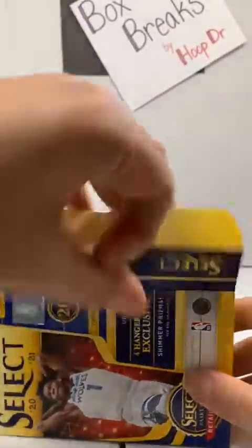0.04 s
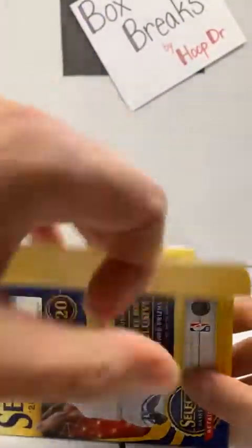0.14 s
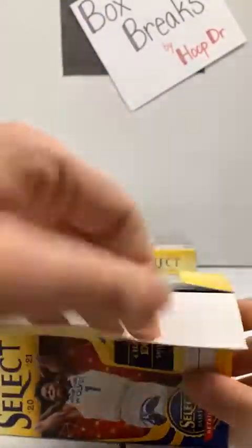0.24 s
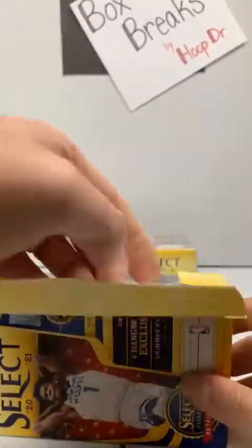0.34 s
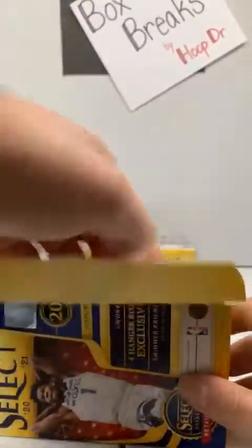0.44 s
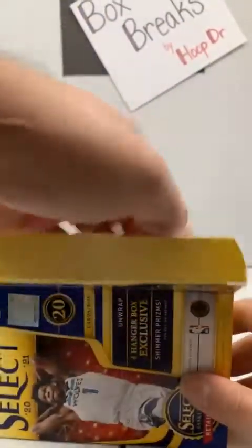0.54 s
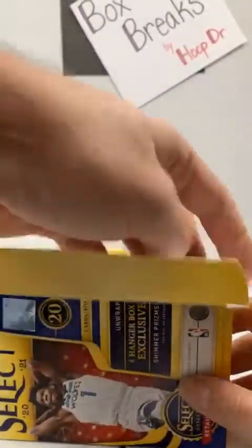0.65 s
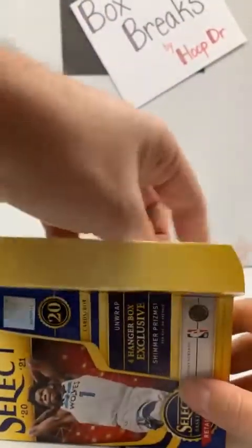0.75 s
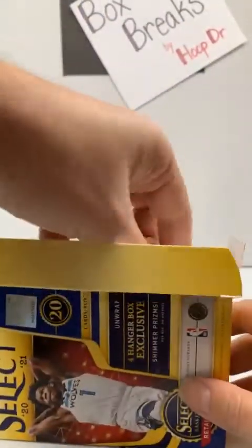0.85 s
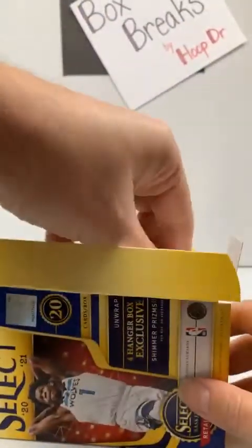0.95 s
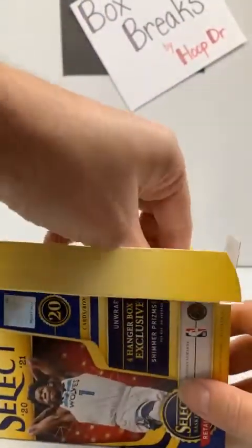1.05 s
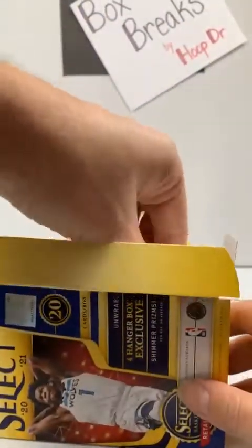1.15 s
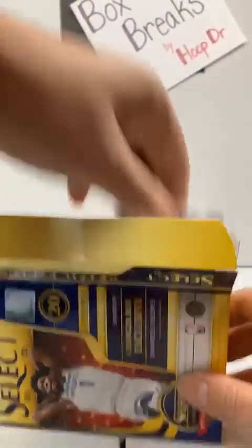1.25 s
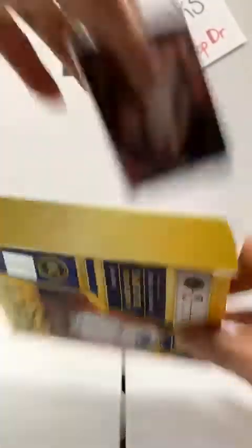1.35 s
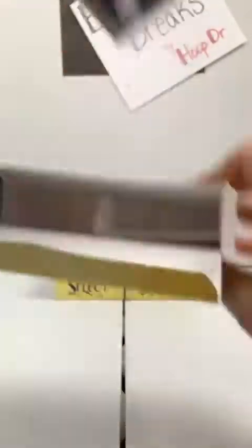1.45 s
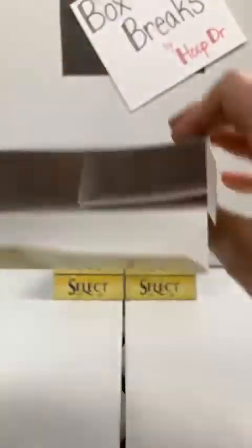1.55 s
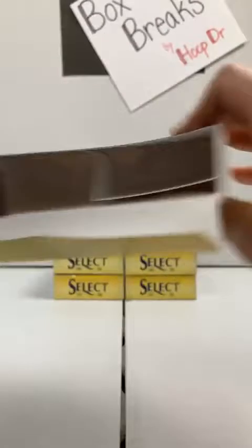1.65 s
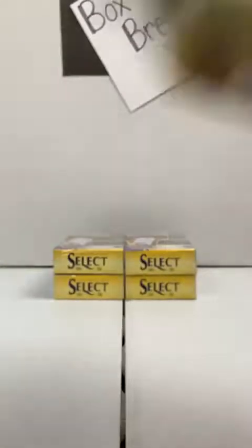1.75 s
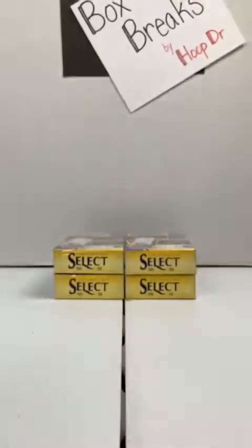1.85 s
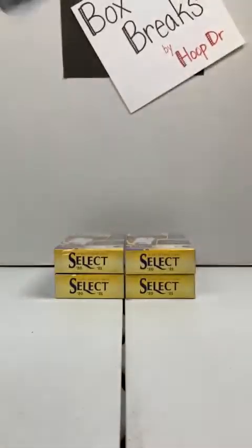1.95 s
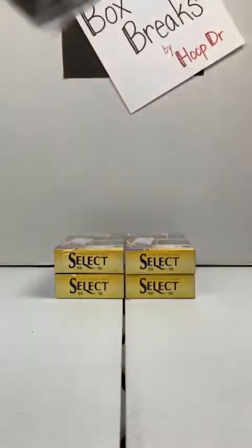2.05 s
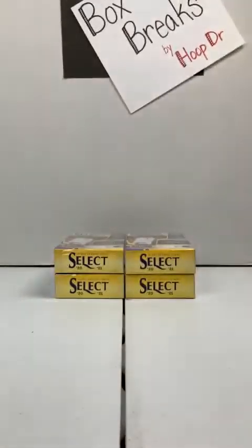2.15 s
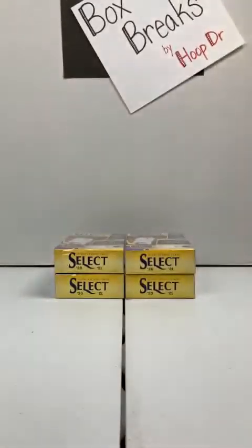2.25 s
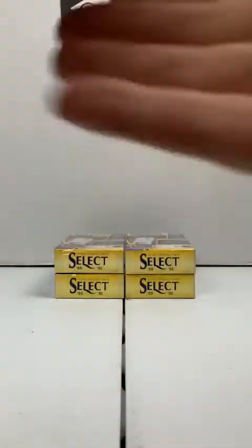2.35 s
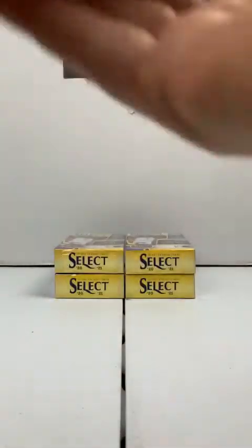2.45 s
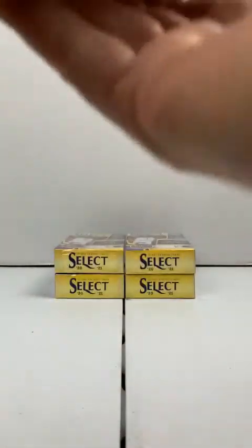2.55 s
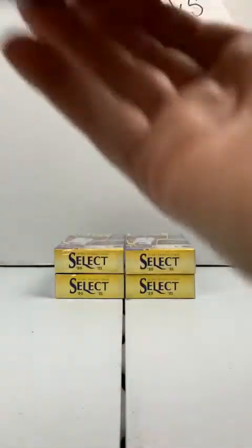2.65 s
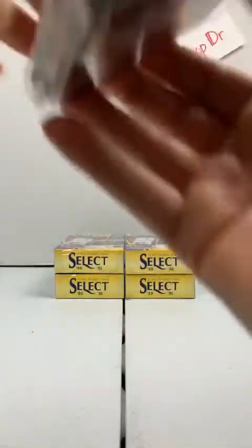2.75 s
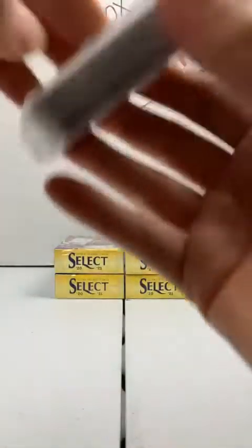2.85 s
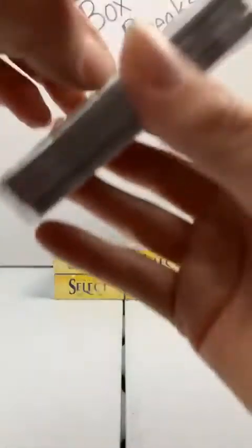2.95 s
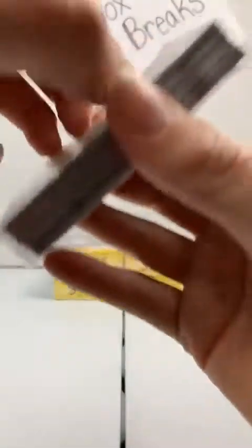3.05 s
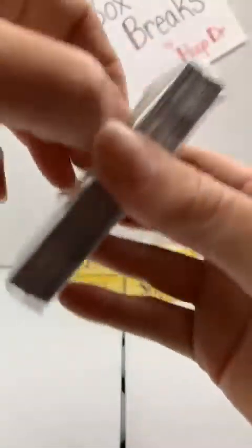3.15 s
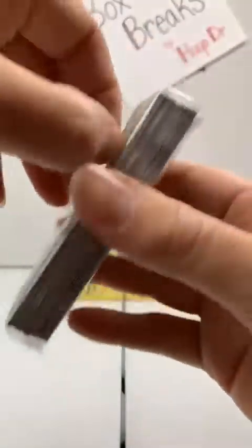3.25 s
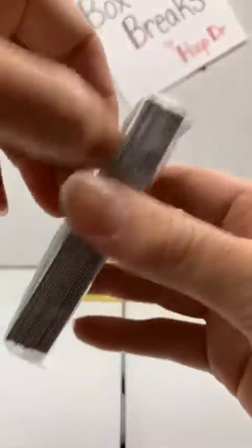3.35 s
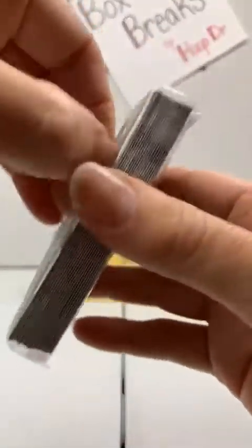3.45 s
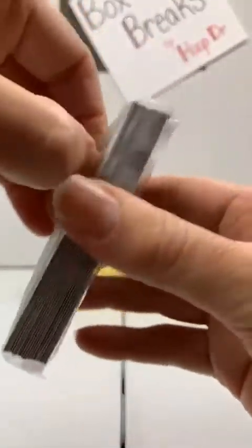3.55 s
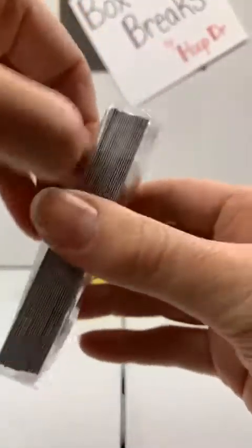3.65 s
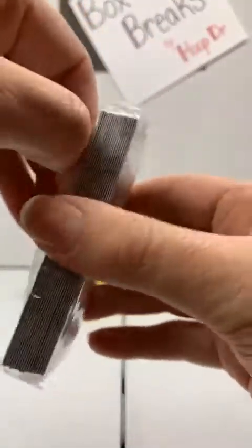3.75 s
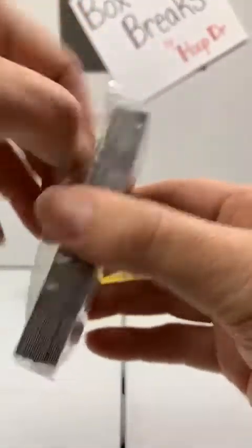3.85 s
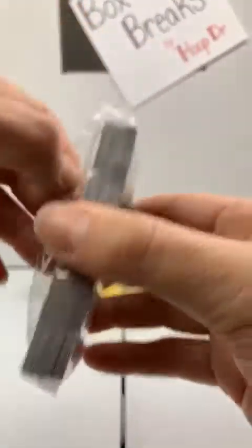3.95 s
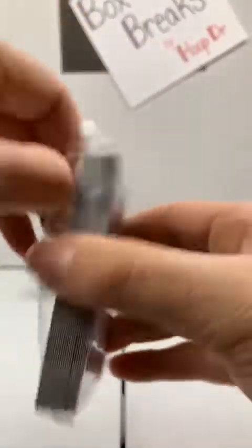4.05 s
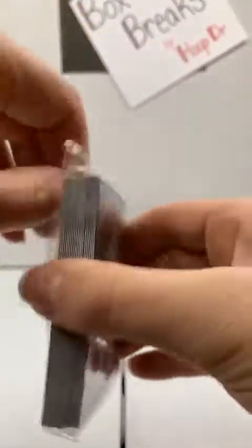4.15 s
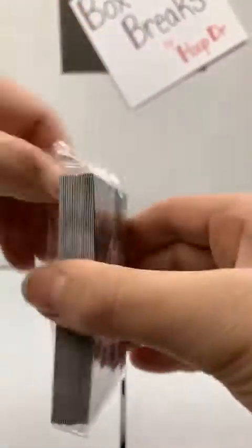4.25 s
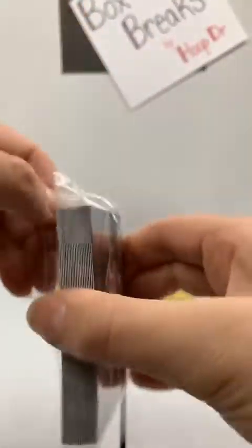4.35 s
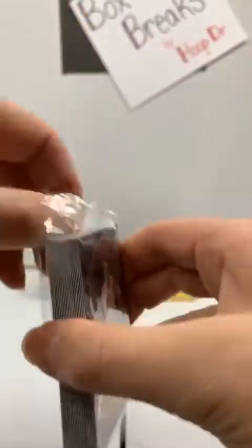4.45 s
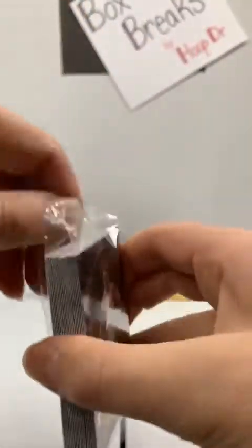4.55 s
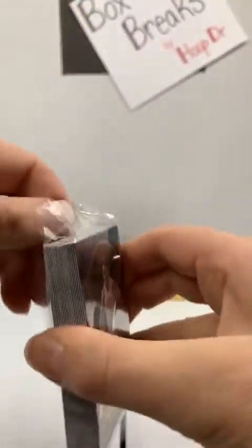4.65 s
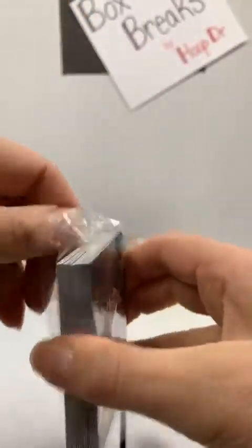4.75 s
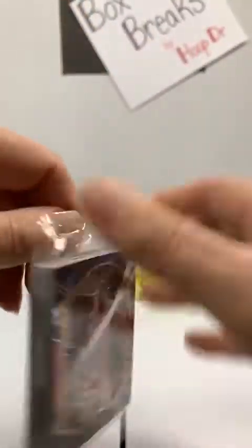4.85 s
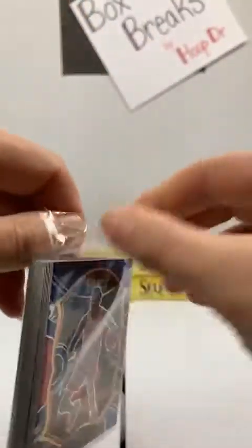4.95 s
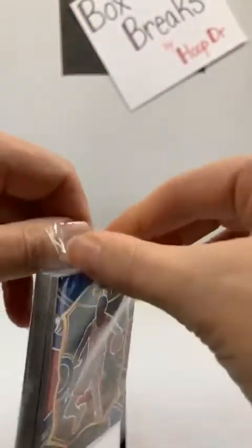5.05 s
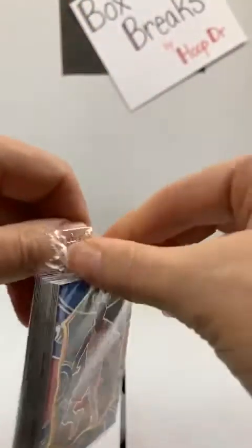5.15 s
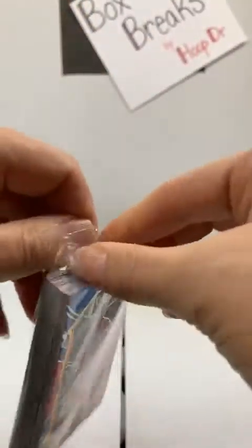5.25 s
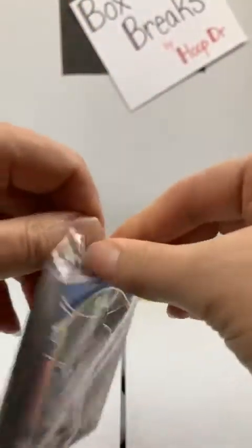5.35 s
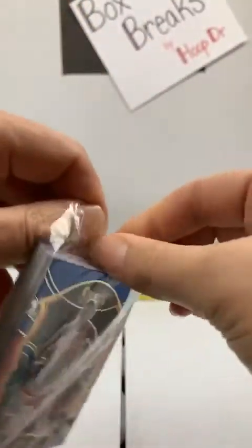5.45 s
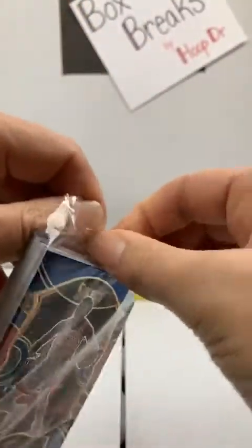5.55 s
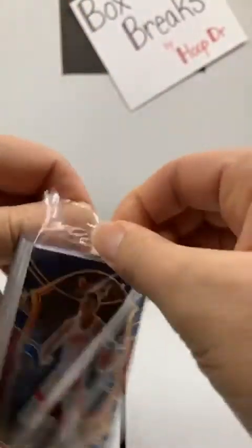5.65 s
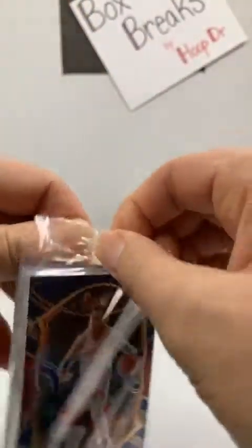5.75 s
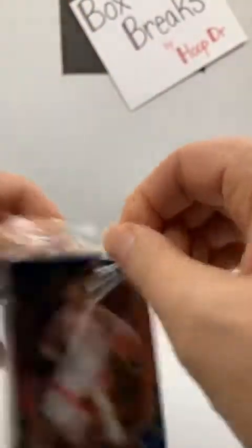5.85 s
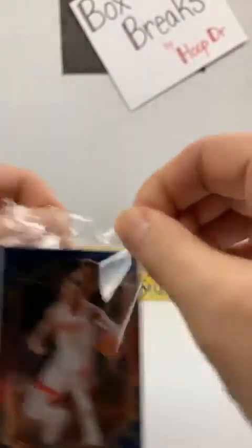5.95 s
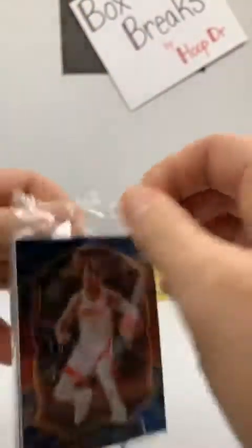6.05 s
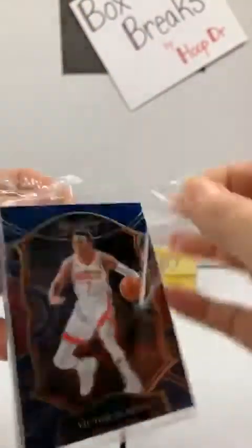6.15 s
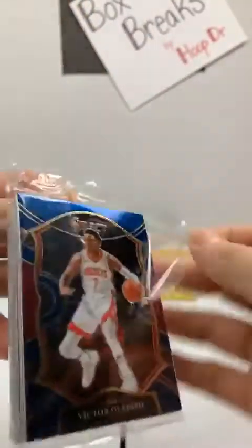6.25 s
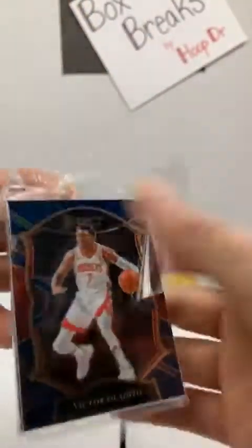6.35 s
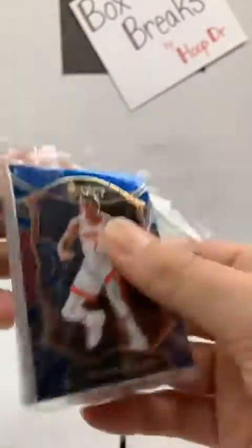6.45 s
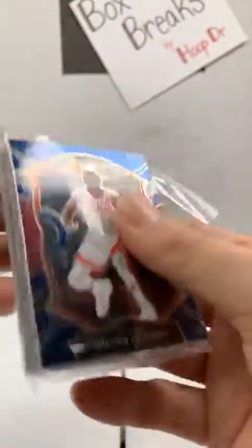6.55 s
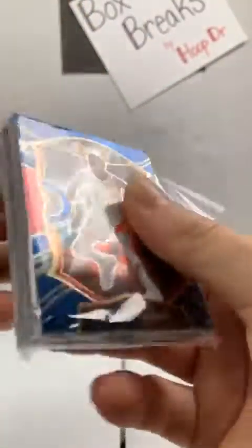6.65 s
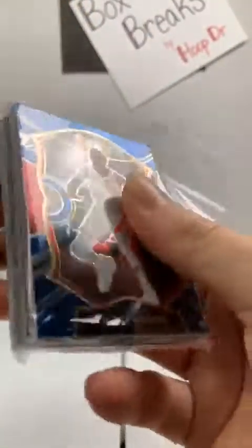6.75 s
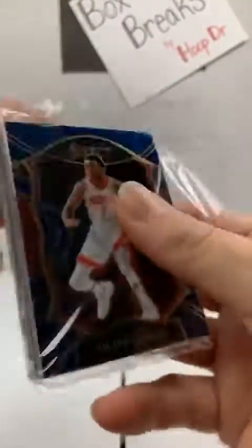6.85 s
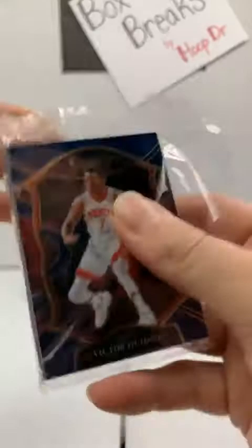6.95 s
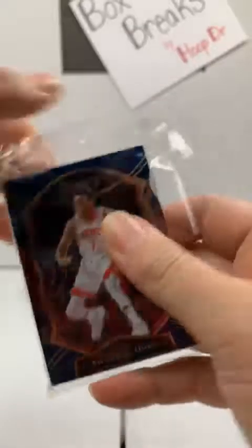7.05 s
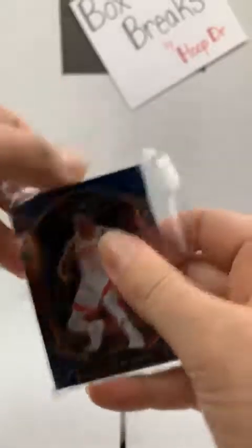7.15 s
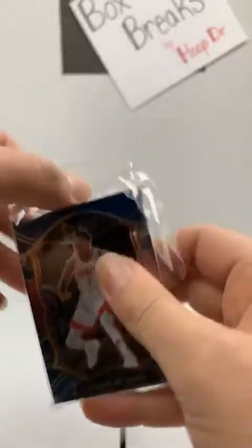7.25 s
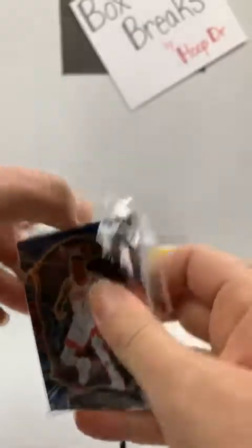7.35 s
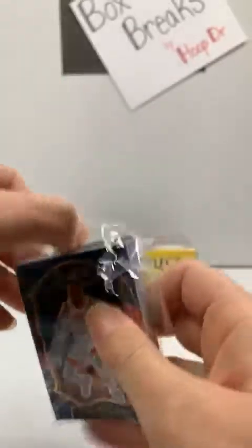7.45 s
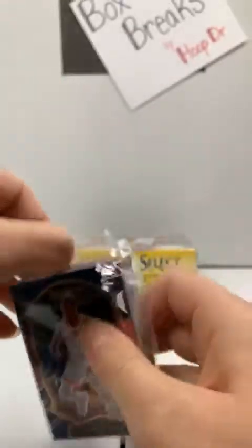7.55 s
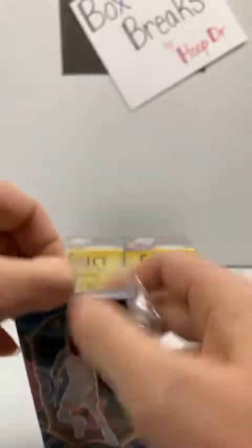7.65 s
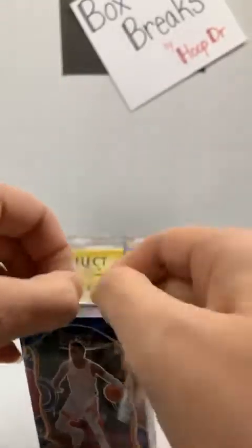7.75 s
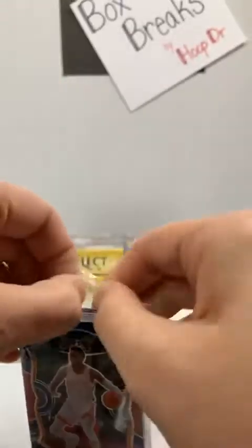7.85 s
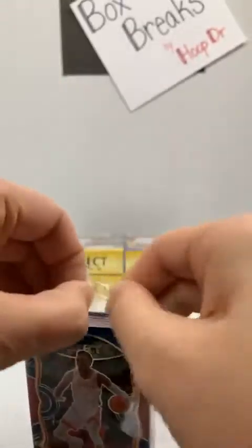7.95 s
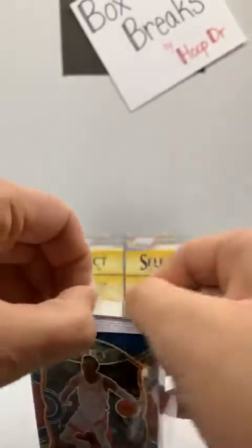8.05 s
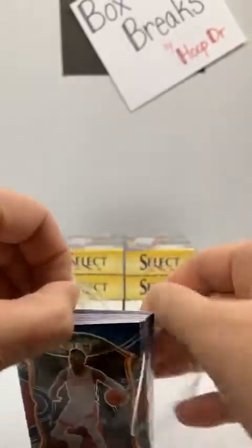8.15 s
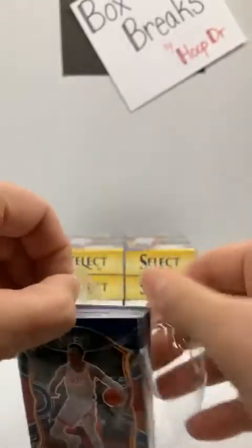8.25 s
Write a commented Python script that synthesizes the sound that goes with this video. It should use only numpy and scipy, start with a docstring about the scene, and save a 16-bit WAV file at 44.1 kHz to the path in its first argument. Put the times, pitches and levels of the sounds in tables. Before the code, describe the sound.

A close, dry sound in a small quiet room with very faint steady air. At 0 s a thin cardboard box gets a firm hollow knock with a low thud, another at 0.1 s, then quick flap ticks to 0.3 s. From 0.5 to 0.75 s come softer papery taps and rubs, then faint scrapes and light edge ticks until 1.5 s. It is nearly silent until about 2.5 s, with only tiny ticks. Around 2.75-2.8 s a clack of cardboard and bright film snaps bursts out. Light, sparse crinkles follow; at 3.97 s one very sharp plastic crack stands out, then thicker crackling with another snap near 4.35 s. From 5.1 s pops come rapidly, peaking in a short tear at 5.9 s. Crinkling eases around 6.3-6.6 s, then continues in uneven pulls with small card taps and a soft thud near 8.2 s.

```python
"""A cardboard box knocks close by: flaps tap, contents slide out, and clear film snaps, crinkles and tears.
Film creases and early edge ticks are noise jolts through a ringing facet; crinkle is a swarm of small flicks
that follows the pulls. Cardboard blows are noise bursts through panel modes with a hollow thump; rubs are
stick-slip impulses and noise. Dull handling thuds are decaying sines. Near reflections and a small room
answer film and box, over faint, steady room air."""
import sys
import numpy as np
from scipy import signal
from scipy.fft import rfft, irfft, next_fast_len
from scipy.io import wavfile
from scipy.ndimage import uniform_filter1d

SR = 44100
rng = np.random.default_rng(int(sys.argv[2]) if len(sys.argv) > 2 else 0)


def transcribe(u):
    """Save the signal u as a 16-bit wav file named by the first command-line argument.

    u: samples, shape (n,) or (channels, n), limited to [-1, 1]; the rate is SR.
    q: integer samples, one column per channel.
    """
    v = np.clip(np.atleast_2d(u).T, -1, 1)
    q = np.round(v * 32767).astype(np.int16)
    wavfile.write(sys.argv[1], SR, q)


N = 365588  # length in samples
JOLT_LEAD = 256  # samples of creaking ahead of the jolt

# colour of the plastic film: frequency_hz, gain_db
FILM_COLOUR = [(500, -52), (1000, -6), (1500, -1.5), (2100, -2), (3300, -1), (5000, 0.5), (8000, -1),
               (11000, -4), (13800, -7), (16000, -18.5)]
# colour of the card stack under the film: frequency_hz, gain_db
STACK_COLOUR = [(40, -30), (100, -18), (200, -6.5), (420, -8), (560, 0.5), (630, -2.5), (740, 2.5),
                (1100, -5), (1450, -2.5), (2200, -17), (6000, -56.5)]
# colour of the hollow air in the box: frequency_hz, gain_db
THUMP_COLOUR = [(25, -28.5), (70, -8.5), (120, -5.5), (190, 0), (280, 1.5), (390, -5), (1200, -68.5)]
# colour of edges and dry cardboard fibres: frequency_hz, gain_db
SCRAPE_COLOUR = [(700, -23.5), (1300, -2), (2150, 3), (3300, -6), (4700, -6), (7000, -10.5), (10000, -18),
                 (15000, -31)]


def snaps():
    """A facet is jolted: it cracks and rings, small ones more briefly, and the cards under it tap."""
    # creases popping over; the first rows, to about 1.5 s, are fingernail or edge ticks on the wrapped
    # pack in the box: start_s, film_level_db, facet_pitch_hz, stack_level_db
    ticks_and_pops = [(0.911, -47.5, 7950, -61), (0.9996, -47, 8600, -51.5), (1.2, -47.5, 5600, -72),
                      (1.25, -47, 8400, -59), (1.4753, -50.5, 8500, -55), (1.499, -48, 9000, -53.5),
                      (1.98, -60.5, 9000, -64), (2.389, -54, 11550, -76), (2.442, -59, 9000, -64),
                      (2.541, -43, 8000, -50), (2.5906, -39.5, 1660, -48), (2.6418, -45.5, 5800, -63),
                      (2.7167, -37.5, 9500, -64), (2.732, -38.5, 6140, -60), (2.7628, -32, 8950, -37),
                      (2.8, -29.5, 9400, -52), (2.8096, -22.5, 5930, -30), (2.9129, -46.5, 7200, -52),
                      (2.957, -40, 7160, -53), (3.005, -41, 10400, -71), (3.065, -41.5, 9400, -56.5),
                      (3.1053, -39.5, 6500, -51.5), (3.2093, -48.5, 1510, -50),
                      (3.2369, -42.5, 6800, -54.5), (3.3624, -39, 6400, -59), (3.4448, -39, 6600, -64),
                      (3.507, -43, 5600, -51), (3.5641, -42, 5600, -59.5), (3.6469, -44, 6660, -48),
                      (3.6821, -39, 6100, -70), (3.7291, -39, 6100, -57), (3.8335, -37, 9100, -56),
                      (3.907, -36.5, 7000, -51), (3.9238, -30.5, 5400, -62), (3.954, -26.5, 7540, -46),
                      (3.9729, -16.5, 3420, -36.5), (4.0868, -40, 5800, -49), (4.2218, -38, 6640, -66),
                      (4.3076, -37, 8700, -55), (4.3366, -34, 1490, -38), (4.3506, -30.5, 5540, -38.5),
                      (4.4761, -44.5, 7400, -46.5), (4.4988, -35, 4970, -60), (4.5296, -36.5, 9400, -46),
                      (4.5792, -42, 2660, -44), (4.6039, -36, 2090, -45), (4.6946, -37.5, 9600, -47),
                      (4.7282, -41.5, 1990, -47.5), (4.8494, -34, 8700, -41), (5.0996, -36.5, 7770, -54.5),
                      (5.116, -34, 4300, -59), (5.1253, -40.5, 9550, -47), (5.1524, -33, 7440, -61),
                      (5.1818, -34.5, 2970, -72), (5.2251, -32.5, 5600, -61), (5.2733, -28.5, 4240, -72),
                      (5.378, -35.5, 4480, -59), (5.466, -32, 4970, -49.5), (5.4804, -31, 6400, -59),
                      (5.4907, -31.5, 4530, -54), (5.5846, -30, 4600, -62), (5.634, -40, 4550, -73),
                      (5.6902, -30.5, 7150, -49), (5.7369, -31.5, 5500, -51), (5.768, -34, 5650, -49),
                      (5.8356, -34.5, 10200, -60), (5.8556, -34, 4470, -62), (5.9104, -31.5, 3500, -41),
                      (5.9294, -28.5, 1400, -32), (5.9639, -34.5, 4730, -51), (6.0006, -29.5, 9600, -44),
                      (6.038, -38, 6300, -56), (6.0494, -30.5, 10870, -66), (6.0783, -29, 4350, -62),
                      (6.1531, -39, 7950, -72), (6.1874, -38.5, 5300, -57), (6.2246, -33.5, 1950, -39.5),
                      (6.292, -34.5, 4670, -45.5), (6.3275, -47.5, 1490, -46.5), (6.41, -40, 4850, -49.5),
                      (6.6145, -37.5, 6530, -48.5), (6.6675, -38.5, 5170, -43), (6.7083, -32, 9300, -44),
                      (6.7747, -37, 8040, -40.5), (6.7884, -37, 6000, -43), (6.829, -34.5, 5970, -45.5),
                      (6.8975, -38.5, 3200, -42.5), (6.9211, -38, 7500, -43), (6.97, -35, 1490, -45),
                      (7.1365, -51, 6000, -68), (7.2223, -37, 4500, -49), (7.2549, -38.5, 4630, -43.5),
                      (7.3891, -41, 3350, -51), (7.479, -36, 8300, -53), (7.4979, -34.5, 9100, -41.5),
                      (7.8322, -35, 8600, -46.5), (7.8718, -32.5, 3920, -61), (7.881, -34, 2600, -52),
                      (7.9407, -31.5, 5350, -74), (8.0344, -39.5, 7900, -56), (8.057, -32, 1950, -50),
                      (8.1022, -35.5, 11800, -72), (8.198, -30, 6040, -42.5), (8.273, -39, 1780, -62)]
    out = np.zeros(N)
    for start_s, film_db, hz, stack_db in ticks_and_pops:
        life_s = 0.019 * (5000 / hz) ** 0.5  # t60 of the jolt: 19 ms at 5 kHz, shorter above
        film_jolt = jolt(life_s, lead_db=-17.5)
        crack = filtered(film_jolt, colour(FILM_COLOUR), facet(hz, damping=0.32, broad=0.5))
        tap = filtered(jolt(t60=0.014, lead_db=-8.5), colour(STACK_COLOUR))
        film_part = amp(film_db) * dose(crack, 0.0031)
        stack_part = amp(stack_db) * dose(tap, 0.0072)
        add(out, start_s - JOLT_LEAD / SR, film_part + stack_part)
    return out


def crinkle(count=14):
    """Many small facets flick over, more often the harder the film is pulled; in a tear they merge."""
    # grips, pulls and tears of the film: start_s, length_s, crinkle_level_db, stack_level_db
    film_pulls = [(1.495, 0.022, -55.5, -70), (2.373, .04, -68, -74.5), (2.535, 0.077, -61, -65),
                  (2.745, 0.058, -46, -38), (2.84, 0.2, -60.5, -64.5), (3.07, 0.058, -58.5, -64),
                  (3.21, 0.14, -68, -69), (3.335, 0.032, -51.5, -56.5), (3.39, 0.17, -61.5, -70),
                  (3.65, 0.038, -55.5, -56), (3.74, 0.17, -54.5, -68), (3.785, .035, -42, -52),
                  (3.93, 0.04, -42.5, -51), (3.955, 0.017, -31.5, -40), (4.03, 0.49, -47, -58),
                  (4.115, 0.053, -41, -46), (4.3, .13, -48.5, -49), (4.325, 0.036, -33, -50),
                  (4.512, 0.223, -42, -51), (4.75, .26, -52.5, -58), (4.835, 0.049, -46, -54),
                  (5.118, .14, -47, -57.5), (5.29, 0.8, -52.5, -63.5), (5.37, .05, -46.5, -64),
                  (5.9, .07, -32, -42.5), (5.98, .15, -43.5, -52), (6.14, 0.22, -49, -56),
                  (6.215, 0.036, -45.5, -49.5), (6.415, 0.042, -49, -56), (6.51, 0.12, -51, -57),
                  (6.655, .085, -40, -51.5), (6.76, .18, -45.5, -54.5), (6.975, 0.023, -48.5, -43),
                  (7.02, 0.048, -57, -58.5), (7.145, .13, -46, -52.5), (7.3, 0.154, -61.5, -64.5),
                  (7.49, .17, -45, -55.5), (7.68, 0.11, -53.5, -59.5), (7.835, 0.156, -49, -58.5),
                  (8.025, .19, -44.5, -57.5), (8.23, .06, -62, -67)]
    # each pull takes hold fast, slackens while it lasts and lets go (dB per s)
    film_gain, stack_gain = gestures(film_pulls, rise=760, sag=6.1, fall=550)

    # flicks per second for each facet size: 16 idle, 26 more at a pull of -40.5 dB
    tension = np.minimum(film_gain / amp(-40.5), 4)
    rate = 16 + 26 * tension ** 2

    film, push = np.zeros(N), np.zeros(N)
    for hz in np.geomspace(1450, 12000, count):
        flicks = slips(rate, spread_db=9)
        ring = filtered(burst(t60=0.0092), facet(hz, damping=0.51, broad=0.41))
        film += signal.oaconvolve(flicks, dose(ring, 0.001))[:N]
        push += flicks

    # film gliding on film adds a faint hiss under the flicks
    rub = amp(-13) * rng.standard_normal(N)
    film = patchy(filtered(unit(film) + rub, colour(FILM_COLOUR)), depth_db=1.0)
    stack = patchy(filtered(unit(push) + rub, colour(STACK_COLOUR)), depth_db=2)
    return film_gain * film + stack_gain * stack


def knocks():
    """Each blow ticks at the edge, rings the panel that it hits most and gives the air in the box one push."""
    # blows on cardboard: start_s, panel_level_db, thump_level_db, tick_level_db, panel_pitch_hz
    blows = [(0.001, -19, -25, -36.5, 940), (0.101, -26.5, -18.5, -34.5, 840),
             (0.126, -42, -51, -56.5, 745), (0.192, -36, -41.5, -44, 870), (0.241, -48, -66, -68, 860),
             (0.303, -39.5, -68, -63, 810), (0.319, -34.5, -64, -35.5, 820),
             (0.517, -37.5, -46.5, -47, 676), (0.56, -45.5, -51, -54, 730), (0.635, -42, -54, -51.5, 760),
             (0.65, -30.5, -39, -44, 670), (0.663, -34, -45, -54, 760), (0.707, -52, -49, -44.5, 745),
             (0.726, -41, -50, -48, 690), (0.89, -44, -43.5, -52, 660), (1.149, -47, -59, -44.5, 704),
             (1.289, -44.5, -47, -48, 684), (1.412, -37, -53, -46, 635), (2.746, -32, -36, -48, 935),
             (2.758, -28, -50, -39, 820), (2.806, -37, -40, -44, 1010)]
    out = np.zeros(N)
    thump = dose(filtered(signal.unit_impulse(SR // 10), colour(THUMP_COLOUR)), 0.0071)
    for start_s, panel_db, thump_db, tick_db, hz in blows:
        ring = filtered(burst(t60=0.025), panels, facet(hz, damping=0.15, broad=0.66))
        tick = filtered(burst(t60=0.035), colour(SCRAPE_COLOUR))
        add(out, start_s, amp(panel_db) * dose(ring, 0.013) + amp(tick_db) * dose(tick, 0.0042))
        add(out, start_s + 0.0034, amp(thump_db) * thump)  # the air answers 3.4 ms later
    return out


def slide():
    """Fingers and contents stick and slip along the cardboard, driving panels, paper grain and box air."""
    # rubs along box and cards: start_s, length_s, panel_level_db, scrape_level_db, hollow_level_db
    rubs = [(0, 0.042, -44, -42, -38.5), (.05, 0.13, -49, -53, -59), (.19, .3, -52.5, -58.5, -67),
            (.305, 0.012, -40, -51.5, -59), (.52, 0.14, -51.5, -59.5, -53), (.64, 0.082, -45, -56, -51),
            (.765, 0.061, -48, -56, -58), (.85, 0.11, -53, -60.5, -61), (1.01, 0.33, -57.5, -59.5, -69),
            (1.15, 0.022, -49, -52, -51.5), (1.315, .06, -41.5, -41, -52), (1.38, 0.037, -53, -45, -60),
            (1.46, 0.064, -62.5, -65, -73.5), (1.55, 0.045, -64.5, -83, -66),
            (1.742, 0.021, -59.5, -74.5, -65), (1.89, 0.054, -61.5, -74.5, -70),
            (1.965, 0.037, -66, -66, -67), (2.755, 0.021, -32, -47, -40.5), (2.8, 0.124, -49, -62, -52.5),
            (2.92, 0.21, -69, -82, -62.5), (3.33, 0.27, -70.5, -71, -67)]
    # every rub has the same shape (dB per s)
    panel_gain, scrape_gain, hollow_gain = gestures(rubs, rise=1200, sag=12, fall=840)
    friction = slips(380, spread_db=7.0) + 0.5 * rng.standard_normal(N)
    body = patchy(filtered(friction, panels), depth_db=2.5, size=512)
    fibres = friction + rng.standard_normal(N)  # the paper grain adds a fine hiss
    scrape = patchy(filtered(fibres, colour(SCRAPE_COLOUR)), depth_db=3.5, size=384)
    hollow = unit(filtered(friction, colour(THUMP_COLOUR)))
    return panel_gain * body + scrape_gain * scrape + hollow_gain * hollow


def bumps():
    """Soft, dull thuds of handling: low sines that swell in over milliseconds and die away."""
    # thuds: start_s, pitch_hz, level_db (before onset and decay), t60_s
    thuds = [(.002, 66, -17, 0.083), (.652, 110, -30, 0.093), (5.915, 66.7, -46, 0.13),
             (8.08, 50.3, -55, 0.28), (8.211, 88, -31, 0.055), (8.227, 49, -45, 0.13)]
    out, t = np.zeros(N), np.arange(SR // 4) / SR
    for start_s, hz, db, t60 in thuds:
        onset = 1 - np.exp(-t / 0.0079)
        add(out, start_s, amp(db - 60 * t / t60) * np.sin(2 * np.pi * hz * t) * onset)
    return out


def room(x, near_db, wet_db, size=3072, order=16384):
    """Near reflections answer at once and a diffuse tail follows; fresh random paths for each block."""
    # decay of the room: frequency_hz, t60_s
    room_decay = [(150, 0.39), (700, 0.25), (2000, 0.27), (5000, 0.31), (14000, 0.27)]
    out = x.copy()
    for start in range(0, N, size):
        hz, t, z = signal.stft(rng.standard_normal(order), SR, nperseg=256)
        decay = amp(-60 * t / along(room_decay, hz)[:, None])
        tail = signal.istft(z * decay, SR, nperseg=256)[1]
        near = burst(t60=0.025, size=len(tail))
        near = np.pad(near, (SR // 1000, 0))[:len(tail)]  # 1 ms after the direct sound
        paths = amp(wet_db) * tail / np.linalg.norm(tail) + amp(near_db) * near / np.linalg.norm(near)
        add(out, start / SR, signal.fftconvolve(x[start:start + size], paths))
    return out


def room_air():
    """Steady noise in the colour of the room's faint air."""
    # colour of the air: frequency_hz, gain_db
    air_colour = [(18, -46.5), (30, -18), (63, 2.5), (118, 5.5), (145, -4), (554, -6.5), (632, -5.5),
                  (684, -12.5), (1350, -13), (2060, -19.5), (16000, -26)]
    return amp(-79.0) * unit(filtered(rng.standard_normal(N), colour(air_colour)))


def jolt(t60, lead_db, size=3072):
    """Quiet creaking noise swells up to one sharp jolt, then a flutter dies fast."""
    t = (np.arange(size) - JOLT_LEAD) / SR
    after = np.maximum(t, 0)
    lead = amp(lead_db + 60 * np.minimum(t, 0) / 0.027) * (t < 0)
    fall = amp(-60 * after / t60) + 0.54 * amp(-60 * after / 0.0033)
    return rng.standard_normal(size) * (lead + fall * (t >= 0))


def burst(t60, size=3072):
    """A flurry of tiny slips that dies away: decaying noise."""
    return rng.standard_normal(size) * amp(-60 * np.arange(size) / SR / t60)


def slips(rate, spread_db):
    """Random impulses, rate a second, their sizes spread evenly in dB; power stays even as rate varies."""
    sizes = amp(spread_db * (2 * rng.random(N) - 1)) * rng.choice([-1, 1], N)
    happens = rng.random(N) < rate / SR
    return unit(sizes * happens / np.sqrt(rate))


def gestures(rows, rise, sag, fall):
    """One gain per sample for each dB column: gestures rise, sag while held and fall; overlaps add in power."""
    power = np.zeros((len(rows[0]) - 2, N))
    t = np.arange(SR) / SR - 0.1  # the rise begins ahead of the start time
    for start_s, length_s, *columns_db in rows:
        held = sag * np.clip(t, 0, length_s)
        shape_db = rise * np.minimum(t, 0) - held - fall * np.maximum(t - length_s, 0)
        for track, db in zip(power, columns_db):
            add(track, start_s + t[0], amp(db + shape_db) ** 2)
    return np.sqrt(power)


def patchy(x, depth_db, size=256):
    """Resonances come and go as fingers change their grip: a smoothed random gain over time and pitch."""
    z = signal.stft(x, nperseg=size)[2]
    field = rng.standard_normal(z.shape)
    for _ in range(2):
        field = uniform_filter1d(field, size=4, axis=0)  # across frequency
        field = uniform_filter1d(field, size=6, axis=1)  # across time
    return unit(signal.istft(z * amp(depth_db * unit(field)), nperseg=size)[1][:N])


def resonance(f, hz, width):
    """One damped mode, width in Hz."""
    return 1j * f * width / (hz * hz - f * f + 1j * f * width)


def panels(f):
    """The box's panel modes together, with alternating sign."""
    # cardboard panel modes: frequency_hz, width_hz, level_db
    panel_modes = [(423, 190, -7.5), (568.6, 63, 2), (688, 63, 2.5), (854, 93, 0), (1012, 48, -0.5),
                   (1200, 150, -6), (1700, 220, -18)]
    return sum((-1) ** k * amp(db) * resonance(f, hz, width)
               for k, (hz, width, db) in enumerate(panel_modes))


def facet(hz, damping, broad):
    """One patch of material: a short ring above a broad crack."""
    return lambda f: broad + resonance(f, hz, damping * hz)


def colour(points):
    """Causal (minimum-phase) response with the gain of (Hz, dB) points."""
    def response(hz):
        cepstrum = irfft(np.log(amp(along(points, hz))))
        cepstrum[1:len(hz) - 1] *= 2  # fold the acausal half onto the causal one
        cepstrum[len(hz):] = 0
        return np.exp(rfft(cepstrum))
    return response


def filtered(x, *responses):
    """Pass x through responses, each a function of frequency."""
    size = 2 * next_fast_len((len(x) + 4096) // 2)  # even, with room for ringing
    hz = np.fft.rfftfreq(size, 1 / SR)
    total = np.prod([r(hz) for r in responses], axis=0)
    return irfft(rfft(x, size) * total, size)[:len(x)]


def along(points, hz):
    """Read (Hz, value) points on a log frequency axis."""
    f, v = np.transpose(points)
    return np.interp(np.log(hz + 1), np.log(f + 1), v)


def amp(db):
    """Decibels to gain."""
    return 10 ** (np.asarray(db) / 20)


def unit(x):
    """Scale to rms 1."""
    return x / np.sqrt(np.mean(x ** 2) + 1e-20)


def dose(x, seconds):
    """Scale a hit to the energy of an rms 1 sound that long."""
    return x * np.sqrt(seconds * SR / (np.sum(x ** 2) + 1e-20))


def add(track, s, sound):
    """Mix a sound in at time s, trimmed to the track."""
    start = round(s * SR)
    sound, start = sound[max(0, -start):], max(0, start)
    track[start:start + len(sound)] += sound[:max(0, N - start)]


def scene():
    """Film and box in the room, with handling thuds, over its faint steady air."""
    film = room(snaps() + crinkle(), near_db=-4.0, wet_db=-8.0)
    box = room(knocks() + slide(), near_db=-7.5, wet_db=-8.5)
    return (film + box + bumps() + room_air())[None]


def record(dry):
    """The microphone channel's band limit: nothing from 16 kHz up passes."""
    return np.array([filtered(channel, lambda hz: hz < 16000) for channel in dry])


dry = scene()
out = record(dry)
transcribe(out)
```